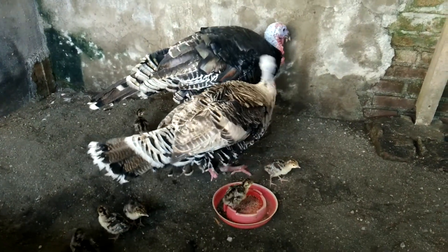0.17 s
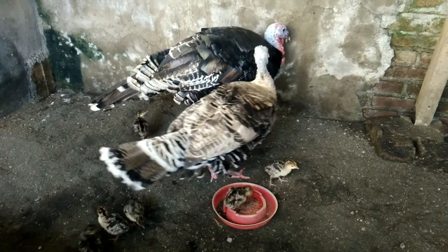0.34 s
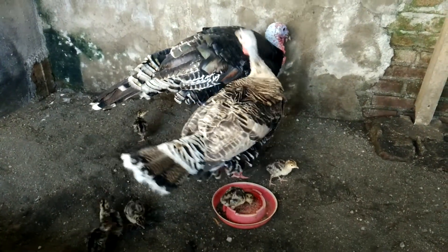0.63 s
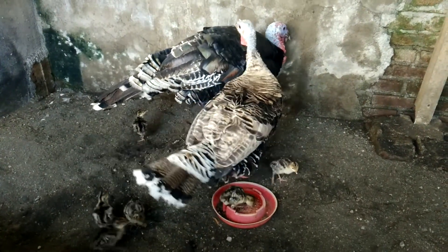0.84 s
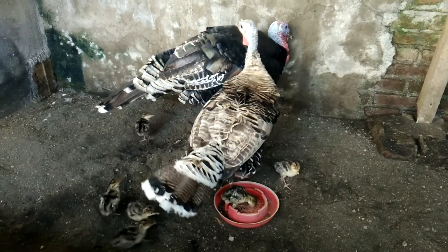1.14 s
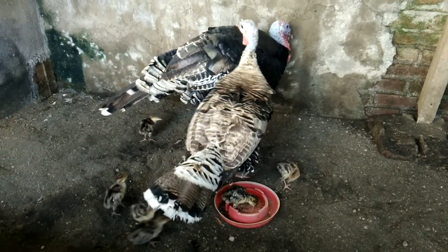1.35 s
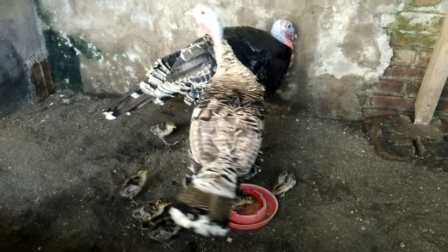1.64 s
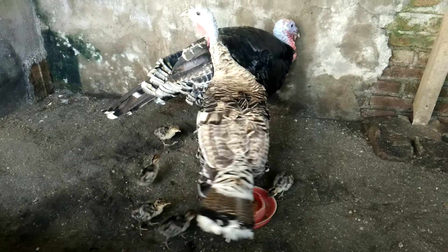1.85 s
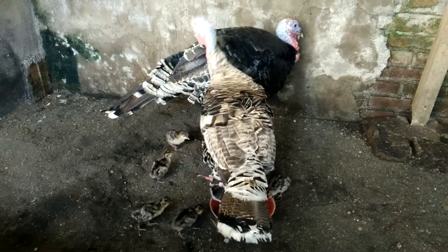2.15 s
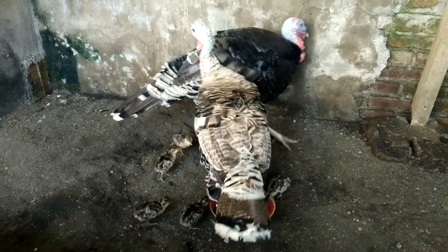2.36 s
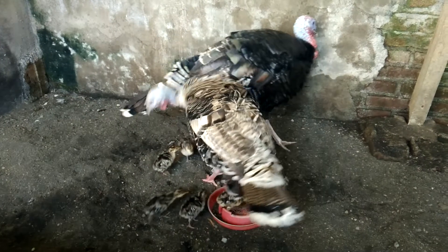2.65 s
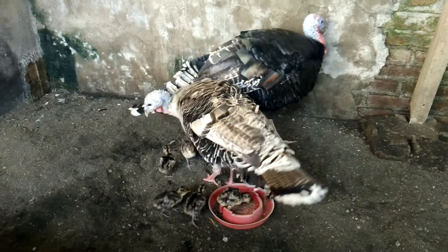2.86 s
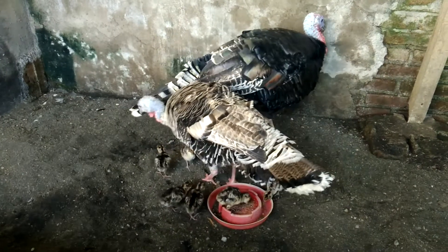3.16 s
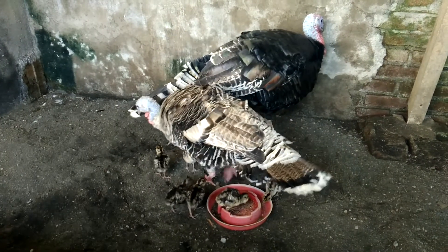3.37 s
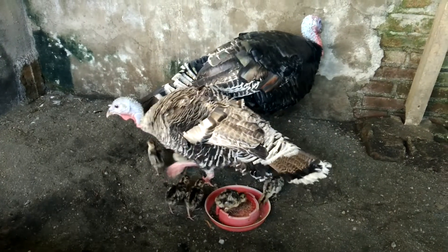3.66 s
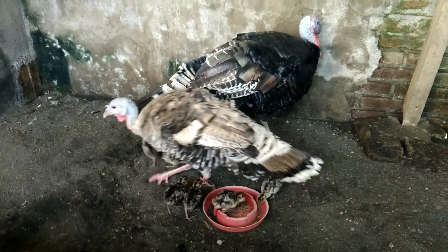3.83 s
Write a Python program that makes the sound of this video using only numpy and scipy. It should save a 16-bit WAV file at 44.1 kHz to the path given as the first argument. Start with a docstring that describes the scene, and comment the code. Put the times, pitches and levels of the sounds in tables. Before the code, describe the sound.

Turkey hens give soft, throaty, falling calls and raspy clucks while chicks peep in a shed.

```python
"""Low hum, shed rumble, and a microphone's hiss and faint whine last throughout, by shaped noise and sines.
From the start chicks peep and whistle with gliding sines, while feet scuff the floor as resonant noise.
Raspy clucks, pulse trains through throat and beak resonances, come in the first part.
Between and after them, turkey hens give soft, throbbing, mostly falling calls: frequency-modulated
whistles with an undertone, an overtone and growing roughness. Hens and chicks echo from nearby walls."""
import sys
import numpy as np
from scipy import signal
from scipy.fft import rfft, irfft
from scipy.io import wavfile

SR = 44100
rng = np.random.default_rng(int(sys.argv[2]) if len(sys.argv) > 2 else 0)


def wav_out(sig):
    """Save sig, one row per channel (or a flat mono array), as 16-bit PCM at SR to the path in sys.argv[1]."""
    wavfile.write(sys.argv[1], SR, np.round(np.clip(np.atleast_2d(sig).T, -1, 1) * 32767).astype(np.int16))


N = 176400


def undb(db):
    """Amplitude gain is ten to the power of decibels over twenty."""
    return 10 ** (np.asarray(db) / 20)


def unit(x):
    """Normalization to a root-mean-square amplitude of 1."""
    return x / np.sqrt(np.mean(x ** 2) + 1e-24)


def clock():
    """Uniform sampling: the time of every sample in seconds."""
    return np.arange(N) / SR


def bins():
    """Discrete spectrum: the frequency of every bin in hertz, kept just above zero."""
    return np.arange(N // 2 + 1) * SR / N + 1e-3


def noise():
    """White noise: independent samples give equal mean power at all frequencies."""
    return rng.standard_normal(N)


def resonate(x, hz, width):
    """A second-order resonance with gain 1 at its centre and the given half-power width in hertz."""
    f = bins()
    return irfft(rfft(x) / (1 + 1j * (f * f - hz * hz) / (f * width)), N)


def wander(hz):
    """Low-pass noise: random motion up to about the given rate, with rms 1."""
    return unit(irfft(rfft(noise()) * np.exp(-(bins() / hz) ** 2), N))


def coloured(points):
    """Spectral shaping: noise follows the given density and falls steeply outside it."""
    hz, db = np.array(points).T
    f = bins()
    skirt = np.minimum(f / hz[0], 1) ** 4 * np.minimum(hz[-1] / f, 1) ** 8
    gain = undb(np.interp(np.log(f), np.log(hz), db))
    return unit(irfft(rfft(noise()) * gain * skirt, N))


def pan(x, db):
    """Level-difference stereo: positive decibels favour the left, and the mid level is kept."""
    gains = undb(np.array([[db], [-db]]) / 2)
    return x * gains / gains.mean()


def ports(x, db, lag):
    """Level and arrival-time difference at two microphone ports: the left one hears later by the lag."""
    left, right = pan(x, db)
    return np.array([np.interp(clock() - lag, clock(), left), right])


def wide(points, side):
    """Mid-side stereo: independent side noise enters the two channels with opposite signs."""
    return coloured(points) + side * coloured(points) * np.array([[1], [-1]])


def progress(start, length):
    """Normalized time: runs from 0 to 1 over an event."""
    return np.clip((clock() - start) / length, 0, 1)


def swell(u):
    """A rounded envelope whose power follows a half sine."""
    return np.sqrt(np.abs(np.sin(np.pi * u)))


def burst(at, length):
    """A Gaussian envelope, falling to exp(-2) one length away from its peak."""
    return np.exp(-2 * ((clock() - at) / length) ** 2)


def narrow_bands(rows):
    """Narrow-band noise: two cascaded resonances, each of twice the listed width, select every band."""
    total = 0
    for hz, width, db in rows:
        band = resonate(resonate(noise(), hz, 2 * width), hz, 2 * width)
        total = total + undb(db) * unit(band)
    return total


def room(x):
    """Diffuse reverberation: convolution with exponentially decaying noise, different in each channel."""
    t60_s, top_hz = 0.22, 5340
    t = np.arange(SR // 2) / SR
    decay = undb(-60 * t / t60_s) * (t > .006)  # first reflections arrive after 6 ms
    tails = rng.standard_normal((2, len(t))) * decay
    dulling = signal.butter(1, min(top_hz, SR / 3), fs=SR, output="sos")
    tails = signal.sosfilt(dulling, tails)
    return np.array([signal.fftconvolve(x, tail / np.linalg.norm(tail))[:N] for tail in tails])


def shed_and_hum():
    """Broadband rumble and narrow-band hum: spectral shape sets the colour, slow modulation the level."""
    # rumble spectrum: (frequency [Hz], relative density [dB])
    shed_spectrum = [(24, -54), (36, -18), (54, -1.5), (95, -2), (129, -2.5), (191, -6.5), (349, -7.5),
                     (405, -12), (518, -9.5), (700, -10), (798, -6), (911, -11), (1380, -10.5), (1700, -16),
                     (2120, -11.5), (2380, -24.5), (2770, -9.5), (3280, -24.5), (3600, -16.5), (4680, -36),
                     (7920, -120)]
    # hum bands: (centre [Hz], half the width of each of two resonances [Hz], relative level [dB])
    hum_bands = [(128.7, 1.05, -72.5), (110.7, 3.4, -75.5), (148.2, 7.3, -77), (134.15, 1.75, -72.5)]
    # course of the hum: (time [s], added level [dB])
    hum_course = [(0, -1.5), (.7, -19), (1.0, 4), (2.2, 1.5), (3.3, 4), (4, 1)]
    # faint whistling bands: (centre [Hz], half the width of each of two resonances [Hz], level [dB])
    whistling_bands = [(2071, 8.2, -83), (2712, 7, -74), (2900, 166, -75)]
    shed_db, flutter_db, flutter_hz, side, pan_db = -63, 2, 4.9, 0.51, 4
    shed = wide(shed_spectrum, side) * undb(shed_db + flutter_db * wander(flutter_hz))
    hum = narrow_bands(hum_bands) * undb(np.interp(clock(), *np.array(hum_course).T))
    return pan(shed + hum + narrow_bands(whistling_bands), pan_db)


def whine_tone(hz):
    """A phase-modulated sine of rms 1: random phase motion slightly broadens its spectral line."""
    waver_rad, waver_hz = 0.69, 40
    phase = 2 * np.pi * hz * clock() + waver_rad * wander(waver_hz)
    return np.sqrt(2) * np.sin(phase)


def electronics():
    """Amplitude modulation of hiss, pulsed whine and thin tones, which rise and sink together."""
    # hiss spectrum: (frequency [Hz], relative density [dB])
    hiss_spectrum = [(1760, -8), (3000, -1), (3200, -1), (5150, -9), (5600, -6.5), (6630, -11.5),
                     (8550, -6), (10300, -9), (12700, -6), (14200, -7)]
    # shared course of hiss and whine: (time [s], relative level [dB])
    hiss_course = [(0.0, -65.5), (0.76, -69), (1.24, -64), (1.41, -67.5), (2.15, -63.5), (2.22, -70),
                   (2.39, -67.5), (3.82, -76), (3.97, -66), (4.0, -68)]
    # thin electronic tones: (frequency [Hz], relative level [dB])
    thin_tones = [(5685, -80), (8401, -80.5), (8856, -87), (11098, -83), (11158, -83), (12110, -88),
                  (13143, -86)]
    hiss_db, side, pan_db = 2, 0.33, 4
    whine_hz, whine_db, pulse_hz, pulse_at_s = 12447, -5, 24.8, 1.063
    tone_follow = .4  # share of the hiss's motion in dB that the thin tones follow

    hiss = wide(hiss_spectrum, side) * undb(hiss_db + 1.4 * wander(37) + 1.5 * wander(910))
    gate = np.clip(.5 + 2 * np.cos(2 * np.pi * pulse_hz * (clock() - pulse_at_s)), 0, 1)
    whine = undb(whine_db) * gate * whine_tone(whine_hz)
    course_db = np.interp(clock(), *np.array(hiss_course).T)
    tones = sum(undb(db) * whine_tone(hz) for hz, db in thin_tones)
    tones = tones * undb(tone_follow * (course_db - course_db.mean()))
    return pan((hiss + whine) * undb(course_db) + tones, pan_db)


def scuffs():
    """Friction noise: cascaded resonances colour the soft steps and brushes of feet and feathers."""
    # (start [s], length [s], centre [Hz], width of each of two resonances [Hz], relative level [dB])
    steps = [(0.108, 0.038, 49.5, 30, -61), (0.376, 0.037, 52, 30, -61), (1.018, 0.12, 363, 248, -56.5),
             (1.194, 0.069, 2830, 1200, -67.5), (1.618, 0.061, 2900, 1810, -60.5),
             (2.271, 0.096, 360, 258, -61), (2.747, 0.05, 75, 40, -62.5), (3.003, .018, 480, 400, -59),
             (2.947, 0.11, 3850, 912, -78), (3.92, 0.084, 9300, 3000, -67)]
    out = np.zeros(N)
    grain = noise() * undb(wander(120))  # 1 dB of uneven strength
    for start, length, hz, width, db in steps:
        brush = unit(resonate(resonate(grain, hz, width), hz, width))
        out += undb(db) * swell(progress(start, length)) * brush
    return pan(out, 5.2)


def sing(hz):
    """Frequency modulation: phase is the running integral of frequency; the sine has rms 1."""
    return np.sqrt(2) * np.sin(2 * np.pi * np.cumsum(hz) / SR)


def peeps():
    """Frequency glides: each thin tone slides to a knee, then breaks into a rougher, fading plunge."""
    # (knee time [s], slide length [s], start pitch [Hz], knee pitch [Hz], plunge length [s],
    #  relative level [dB])
    falling_peeps = [(0.005, 0.042, 7030, 6200, .016, -58), (0.291, 0.029, 7300, 6200, 0.025, -57),
                     (0.59, 0.051, 7250, 6150, 0.025, -60.5), (0.887, 0.054, 7160, 6100, 0.026, -61.5),
                     (1.192, .05, 7130, 6200, .028, -59.5), (1.516, 0.041, 7200, 6200, 0.036, -61),
                     (1.816, .05, 7070, 6200, 0.034, -58.5), (2.102, 0.1, 7230, 6300, 0.021, -60),
                     (2.404, 0.04, 6900, 6100, .03, -68), (0.373, 0.06, 4650, 4150, 0.056, -66.5),
                     (1.326, 0.029, 4710, 4250, 0.013, -60), (2.018, .02, 4740, 4200, 0.02, -62.5),
                     (2.239, 0.02, 6000, 5000, 0.011, -58.5), (2.255, 0.0187, 4650, 4200, 0.0116, -58),
                     (2.982, 0.034, 4390, 3900, 0.023, -66.5), (3.061, 0.024, 5000, 4500, 0.023, -65.5),
                     (3.235, .02, 4180, 3800, 0.023, -74), (3.391, 0.024, 4550, 4100, 0.017, -65.5),
                     (3.872, 0.019, 3750, 3050, 0.0065, -58), (3.91, 0.026, 4400, 3400, 0.0072, -61)]
    plunge_share, plunge_fade_db, swell_power = .55, -5, 1.54  # plunge ends at this share of the pitch
    slide_quaver, plunge_quaver, quaver_hz = .011, .05, 650  # quavers as shares of the pitch
    out, quaver = np.zeros(N), wander(quaver_hz)
    for knee, slide_s, start_hz, knee_hz, plunge_s, db in falling_peeps:
        slide = progress(knee - slide_s, slide_s)
        plunge = progress(knee, plunge_s)
        hz = (start_hz + (knee_hz - start_hz) * slide) * plunge_share ** plunge
        hz = hz * (1 + (slide_quaver * slide + plunge_quaver * plunge) * quaver)
        envelope = slide ** swell_power * (1 - plunge ** 6)
        out += undb(db + plunge_fade_db * plunge) * envelope * sing(hz)
    return out


def whistles():
    """Parabolic frequency modulation: lower chick tones rise and fall in a gentle arch."""
    # (start [s], length [s], top pitch before waver [Hz], sag at the ends [Hz], relative level [dB])
    arches = [(0.678, 0.098, 4200, 205, -67.5), (0.885, 0.11, 4413, 220, -59.5),
              (1.152, .105, 4710, 519, -59), (1.427, 0.085, 4760, 400, -58.5),
              (1.742, 0.1, 4750, 521, -59.5), (2.999, 0.047, 5120, 657, -65.5),
              (1.36, 0.059, 4040, 297, -66), (3.32, 0.021, 3980, 700, -71), (3.935, .035, 4100, 600, -69.5)]
    out, waver = np.zeros(N), 1 + 0.005 * wander(330)
    for start, length, hz, sag_hz, db in arches:
        u = progress(start, length)
        pitch_hz = (hz - sag_hz * (2 * u - 1) ** 2) * waver
        out += undb(db) * np.sin(np.pi * u) * sing(pitch_hz)
    return out


def chicks():
    """Amplitude modulation: one random flutter in level is shared by the peeps and whistles."""
    flutter_db, flutter_hz = 2.13, 74
    return (peeps() + whistles()) * undb(flutter_db * wander(flutter_hz))


def clucks():
    """Source and filter: uneven pulses and breath noise ring the throat and, more weakly, the open beak."""
    # (start [s], length [s], throat resonance [Hz], relative level [dB])
    cluck_events = [(0.012, 0.14, 1070, -63.5), (0.588, 0.081, 1030, -56), (0.6, 0.028, 930, -53.5),
                    (1.017, 0.056, 1037, -44.5), (1.061, 0.069, 834, -42), (1.114, 0.075, 800, -50.5)]
    pulse_hz, throat_width_hz, beak_db, air = 115, 220, -15, .55  # mean pulse rate
    cycles = np.cumsum(pulse_hz * (1 + .35 * wander(120))) / SR
    clicks = np.diff(np.floor(cycles), prepend=0)  # a step at each whole cycle
    source = unit(clicks * undb(0.77 * wander(120))) + air * noise()
    beak = unit(resonate(resonate(source, 1380, 720), 1270, 1200))
    out = np.zeros(N)
    for start, length, hz, db in cluck_events:
        throat = unit(resonate(resonate(source, hz, throat_width_hz), hz, 420))
        envelope = swell(progress(start, length) ** 0.48)  # fast rise, slower fall
        out += undb(db) * envelope * (throat + undb(beak_db) * beak)
    return ports(out, db=3.5, lag=0.00017)


def hens():
    """Phase-locked partials: a whistle, an octave undertone and a weak overtone, with rasp growing in a call."""
    # one curve per call: (time [s], whistle pitch before jitter [Hz], relative level [dB])
    hen_curves = [
        [(0.238, 1073, -80), (0.249, 1031, -46.5), (0.276, 1071, -52.5), (0.289, 1057, -45), (0.302, 1033, -48),
         (0.311, 1016, -55), (0.319, 1051, -47), (0.358, 983, -42), (0.376, 922, -51.0), (0.385, 930, -43),
         (0.406, 968, -47.5), (0.412, 956, -66), (0.422, 947, -46.5), (0.453, 965, -54.0), (0.474, 947, -45),
         (0.5, 936, -58), (0.517, 924, -43), (0.531, 900, -67), (0.559, 910, -51.5)],
        [(0.683, 1050, -72), (0.698, 1072, -42.5), (0.711, 1040, -41.5), (0.716, 1035, -60),
         (0.723, 1000, -49.0), (0.73, 1028, -58), (0.737, 1012, -40), (0.744, 977, -39.0), (0.757, 996, -38.5),
         (0.768, 979, -34.5), (0.782, 928, -39.5), (0.788, 905, -47.5), (0.802, 962, -36.5), (0.825, 940, -75)],
        [(1.478, 796, -47), (1.483, 800, -60), (1.488, 920, -53), (1.498, 958, -41), (1.515, 1006, -48.5),
         (1.538, 1003, -53), (1.564, 1038, -39.0), (1.57, 971, -29.5), (1.584, 940, -31.5), (1.595, 884, -41),
         (1.599, 904, -34), (1.602, 870, -44.0), (1.621, 917, -34.5), (1.628, 843, -42), (1.637, 858, -31.5),
         (1.643, 860, -45), (1.663, 938, -38), (1.669, 1000, -48), (1.681, 845, -47), (1.69, 897, -55),
         (1.699, 930, -71)],
        [(2.112, 885, -77), (2.125, 735, -45.5), (2.132, 911, -54), (2.149, 951, -49), (2.159, 1139, -61),
         (2.196, 958, -48), (2.205, 956, -32.5), (2.213, 963, -31), (2.228, 949, -36.5), (2.233, 960, -47.5),
         (2.244, 947, -37.5), (2.264, 952, -31.5), (2.274, 955, -42.5), (2.279, 922, -54.5), (2.286, 963, -39),
         (2.3, 924, -38.0), (2.33, 954, -44.5), (2.332, 958, -63), (2.349, 920, -51), (2.359, 934, -58.0)],
        [(2.678, 873, -62), (2.687, 804, -41.5), (2.696, 1104, -60), (2.704, 1097, -44.5), (2.707, 1157, -64),
         (2.743, 1276, -54.5), (2.746, 1235, -61), (2.755, 1084, -37.0), (2.775, 1005, -34), (2.781, 1034, -46),
         (2.785, 975, -37), (2.788, 914, -47), (2.791, 941, -39.0), (2.804, 956, -33.5), (2.809, 990, -43),
         (2.816, 938, -44), (2.823, 905, -40), (2.832, 950, -34), (2.837, 921, -45.5), (2.843, 975, -38),
         (2.86, 943, -69)],
        [(3.172, 856, -59.5), (3.183, 1100, -53.5), (3.199, 1152, -44.5), (3.213, 1124, -48), (3.23, 1150, -44),
         (3.25, 1096, -55), (3.263, 1070, -42), (3.269, 1070, -44.5), (3.29, 1047, -38.5), (3.295, 993, -50),
         (3.305, 991, -37.5), (3.315, 1050, -51), (3.322, 997, -41.5), (3.345, 990, -63)],
        [(3.535, 951, -70), (3.548, 1066, -54), (3.57, 1163, -44), (3.609, 1116, -56), (3.621, 1058, -37),
         (3.631, 966, -34), (3.633, 970, -45), (3.635, 968, -34), (3.651, 953, -30), (3.658, 957, -43),
         (3.662, 1025, -35), (3.664, 996, -29.5), (3.666, 960, -33), (3.668, 920, -47), (3.674, 992, -43),
         (3.687, 870, -55), (3.7, 930, -46)],
        [(3.88, 895, -46), (3.888, 970, -65), (3.891, 1005, -50.5), (3.925, 1128, -46), (3.957, 1090, -39.5),
         (3.97, 1010, -35.5), (3.975, 1040, -33.5), (3.98, 1011, -37.5), (3.991, 1058, -35), (3.995, 1060, -44),
         (3.999, 1072, -50)],
    ]
    # one voice per call: (undertone relative level [dB], its peak time [s], its length [s],
    #  roughness at the end [0-1], left-right level difference [dB], lag of the left port [s])
    hen_voices = [(-55.5, 0.383, 0.043, 0.05, 3, 0.0002), (-65, 0.763, .08, 0.01, 4.9, .00022),
                  (-62, 1.612, 0.1, .05, 7, 0.00024), (-67.5, 2.23, 0.093, 0.1, 9, 0.00028),
                  (-63.5, 2.8, 0.11, 0.1, 3, 0.00023), (-60, 3.3, 0.065, .18, 2.5, 0.00023),
                  (-57, 3.65, 0.059, 0.28, 1.8, 0.00024), (-51.5, 3.985, 0.12, 0.21, 2.5, .00027)]
    # nasal overtone of each call: (peak time [s], length [s], relative level [dB])
    hen_overtones = [(0.426, 0.15, -61.5), (0.767, 0.055, -66), (1.604, 0.13, -72), (2.24, 0.15, -73),
                     (2.79, 0.082, -64.5), (3.275, 0.042, -67), (3.623, 0.046, -65.5),
                     (3.976, 0.055, -66.5)]
    whistle_db, overtone_lag_s, overtone_rasp = -1, .0001, .4
    jitter_share, jitter_hz, rasp_hz = 0.00804, 174, 196
    rasp_pitch_share = 0.87  # centre of the rasp as a share of the whistle's pitch
    edge_s = 0.0014  # fade at both ends of a call

    t, out = clock(), np.zeros((2, N))
    jitter, rasp, scrape = wander(jitter_hz), wander(rasp_hz), wander(rasp_hz)
    for curve, voice, (over_s, over_length, over_db) in zip(hen_curves, hen_voices, hen_overtones):
        under_db, under_s, under_length, rough, pan_db, lag = voice
        s, hz, db = np.array(curve).T
        u = progress(s[0], s[-1] - s[0])
        pitch_hz = np.interp(t, s, hz) * (1 + jitter_share * jitter)
        phase = 2 * np.pi * np.cumsum(pitch_hz) / SR
        rasp_phase = rasp_pitch_share * phase
        grit = rasp * np.sin(rasp_phase) + scrape * np.cos(rasp_phase)
        whistle = (np.sin(phase) + rough * u * grit) * undb(np.interp(t, s, db) + whistle_db)

        under_level = undb(under_db) * burst(under_s, under_length) * (1 + .5 * scrape)
        undertone = under_level * np.sin(phase / 2)
        over_level = undb(over_db) * burst(over_s, over_length) * (1 + overtone_rasp * rasp)
        overtone = over_level * np.sin(2 * phase)

        gate = np.sqrt(2) * np.clip(np.minimum(t - s[0], s[-1] - t) / edge_s, 0, 1)
        out += ports(gate * (whistle + undertone), pan_db, lag)
        out += ports(gate * overtone, pan_db, overtone_lag_s)
    return out


def scene():
    """Superposition: direct voices, their diffuse echo, footfalls and background add linearly."""
    hen_echo_db, chick_echo_db, chick_pan_db, chick_lag_s = -17, -3, -4, .00004
    adults, young = hens() + clucks(), chicks()
    echo = room(undb(hen_echo_db) * adults.mean(0) + undb(chick_echo_db) * young)
    background = shed_and_hum() + electronics()
    return background + scuffs() + echo + ports(young, chick_pan_db, chick_lag_s) + adults


def record(dry):
    """Band limiting: an elliptic low-pass filter cuts the top steeply."""
    top_hz = 14300
    return signal.sosfilt(signal.ellip(12, .2, 80, top_hz, fs=SR, output="sos"), dry)


dry = scene()
out = record(dry)
wav_out(out)
```